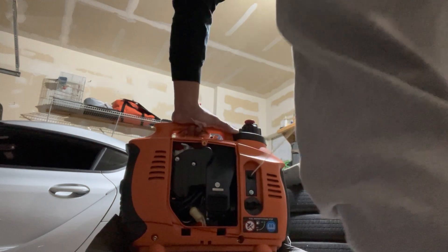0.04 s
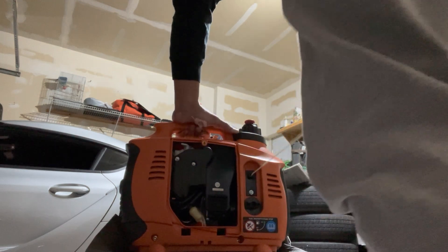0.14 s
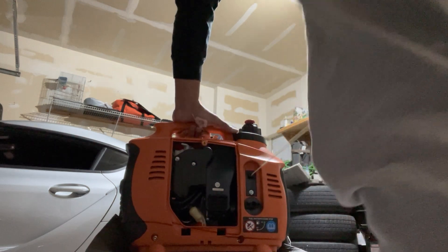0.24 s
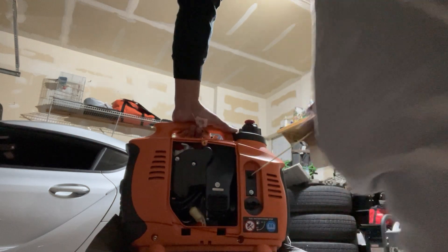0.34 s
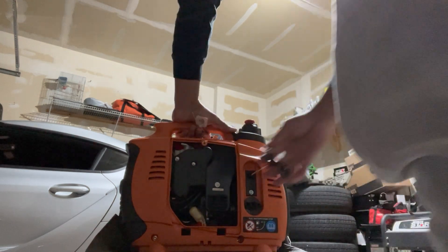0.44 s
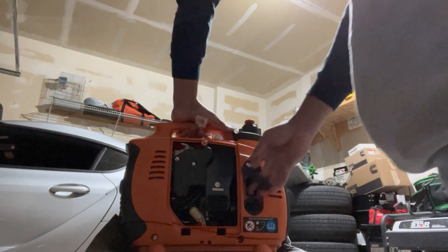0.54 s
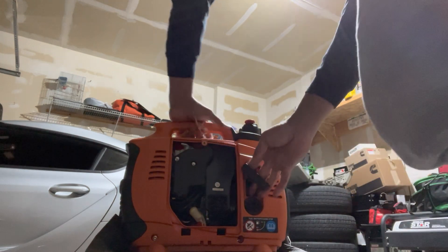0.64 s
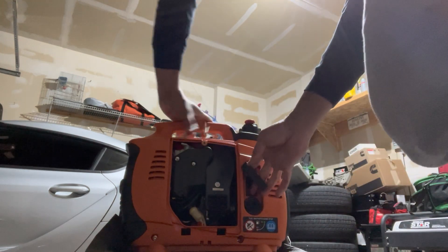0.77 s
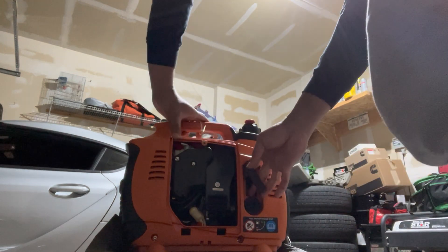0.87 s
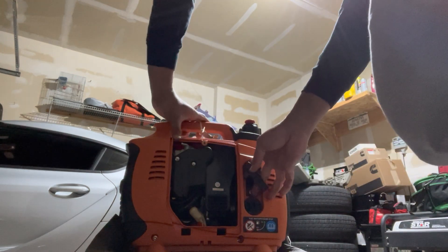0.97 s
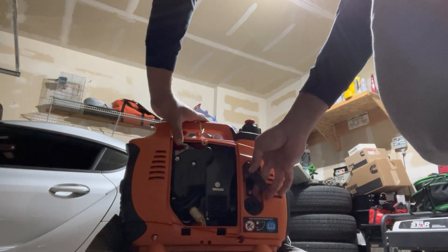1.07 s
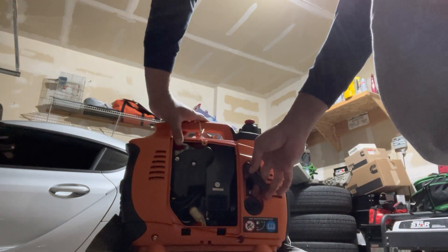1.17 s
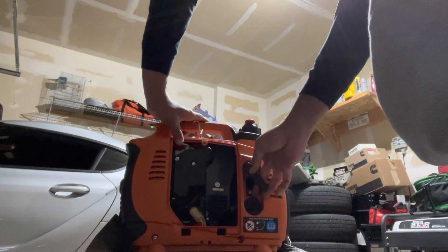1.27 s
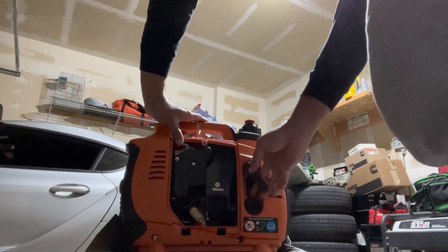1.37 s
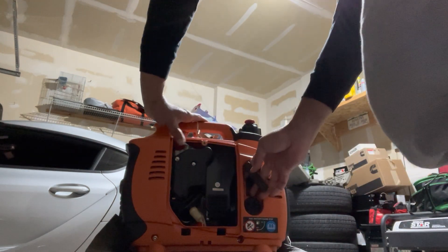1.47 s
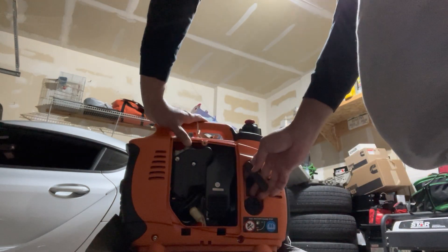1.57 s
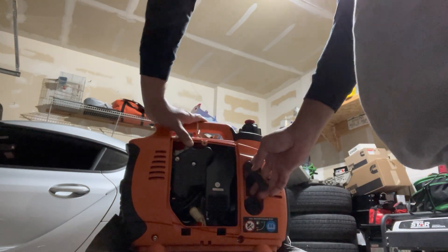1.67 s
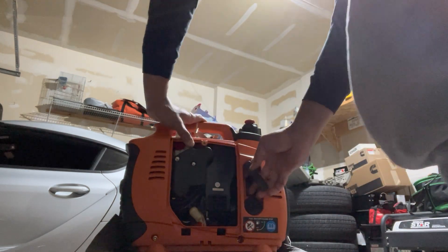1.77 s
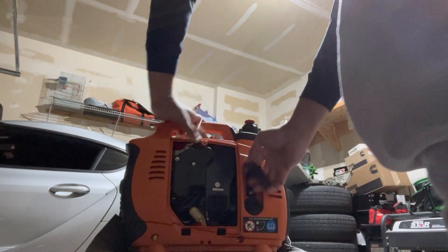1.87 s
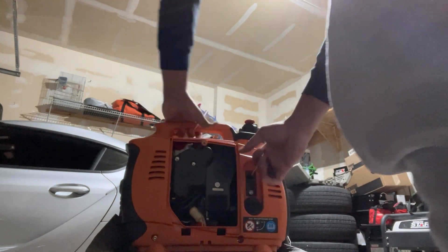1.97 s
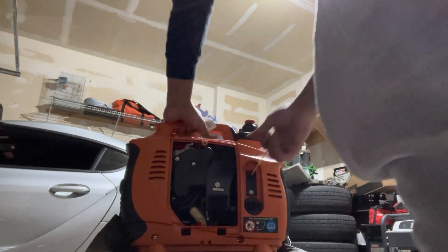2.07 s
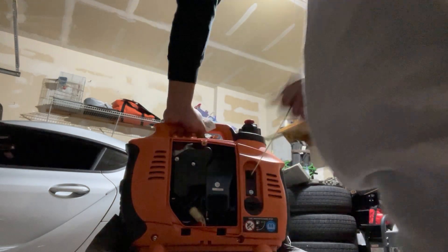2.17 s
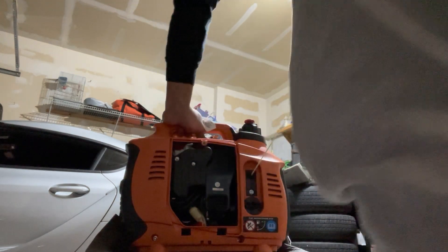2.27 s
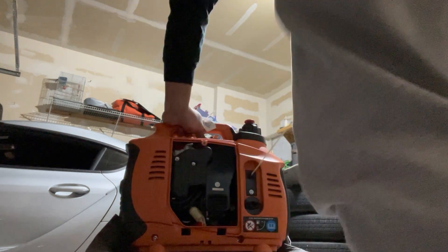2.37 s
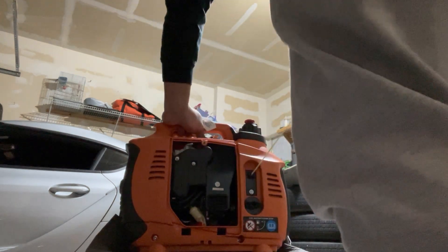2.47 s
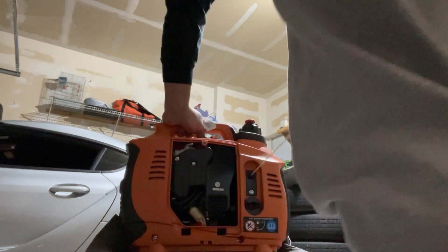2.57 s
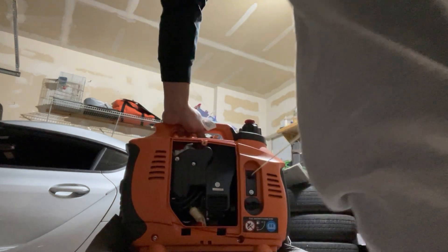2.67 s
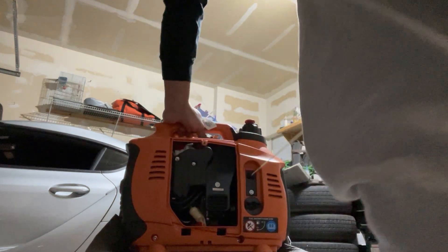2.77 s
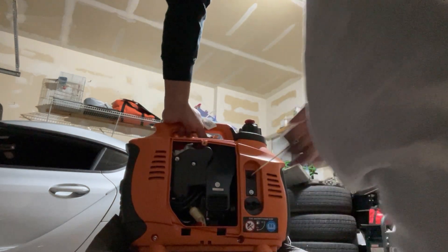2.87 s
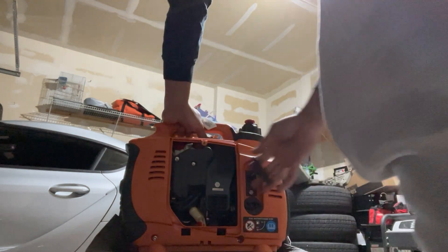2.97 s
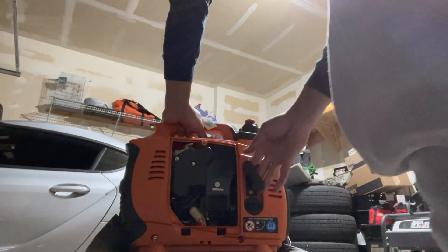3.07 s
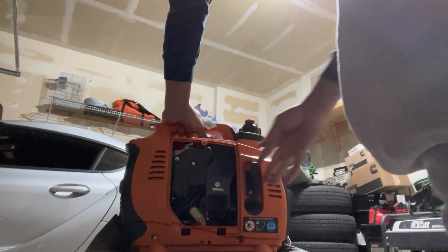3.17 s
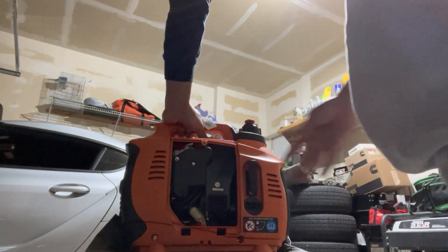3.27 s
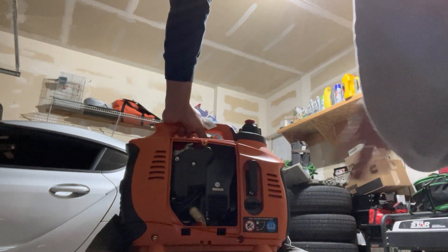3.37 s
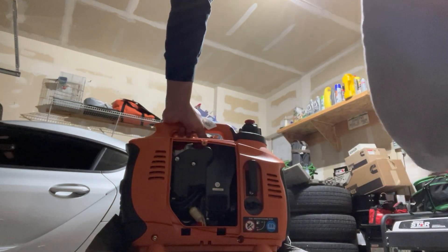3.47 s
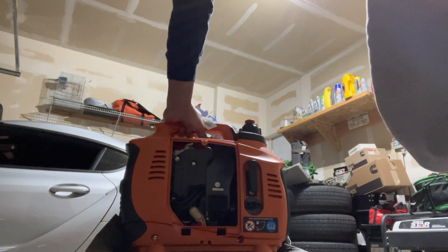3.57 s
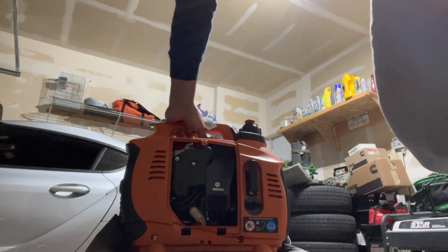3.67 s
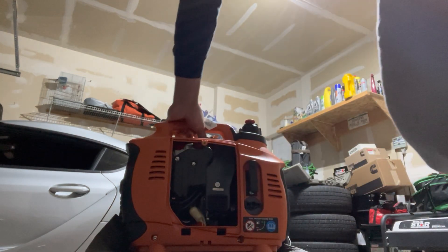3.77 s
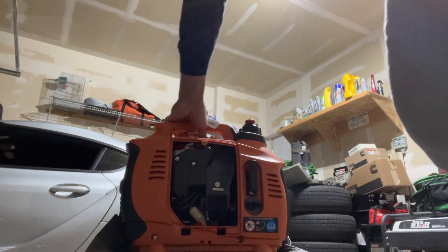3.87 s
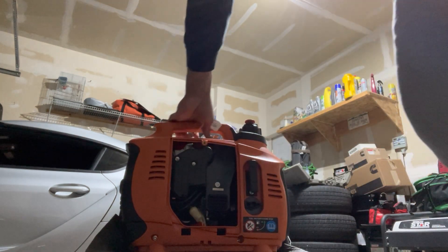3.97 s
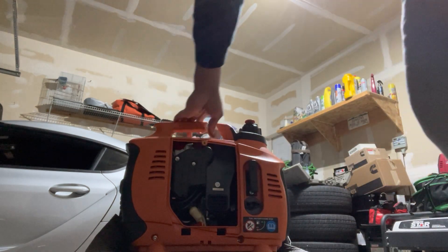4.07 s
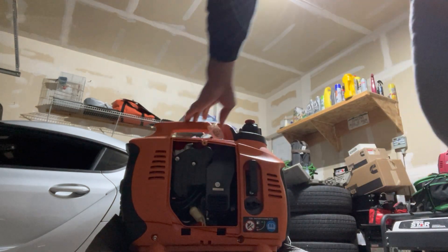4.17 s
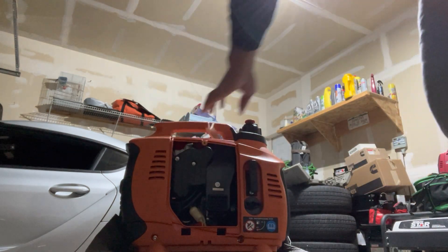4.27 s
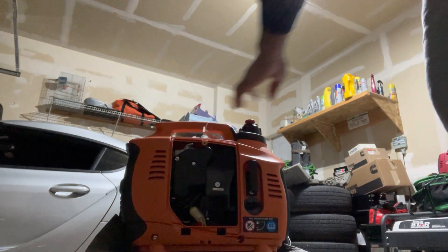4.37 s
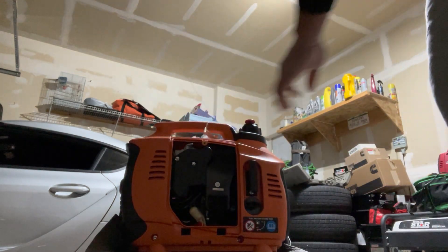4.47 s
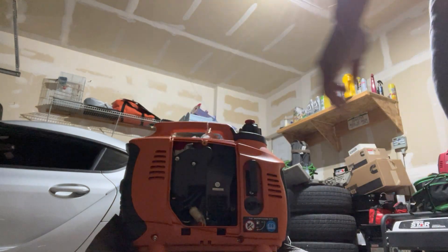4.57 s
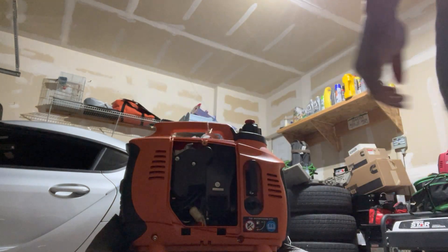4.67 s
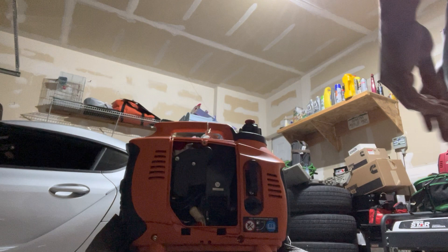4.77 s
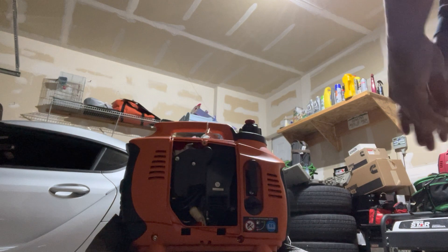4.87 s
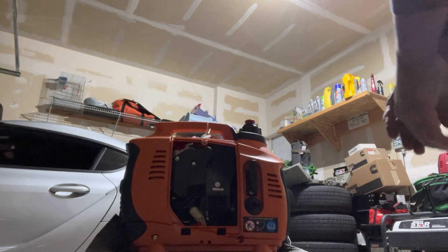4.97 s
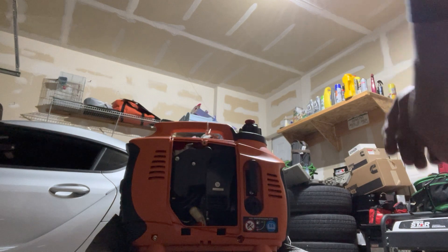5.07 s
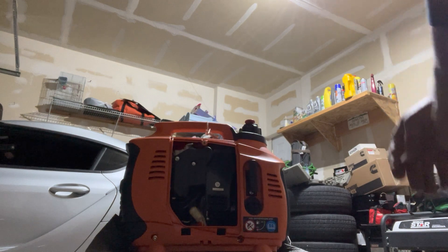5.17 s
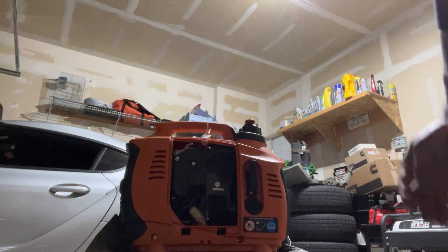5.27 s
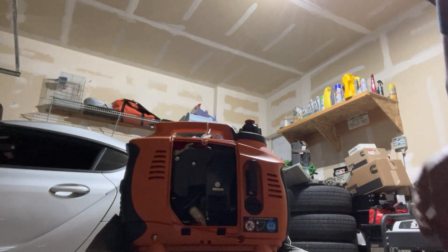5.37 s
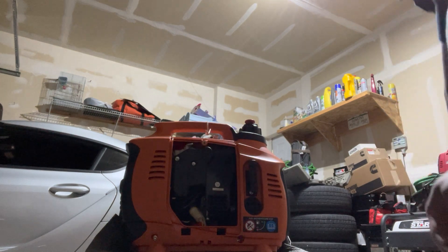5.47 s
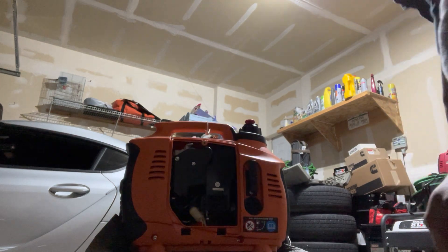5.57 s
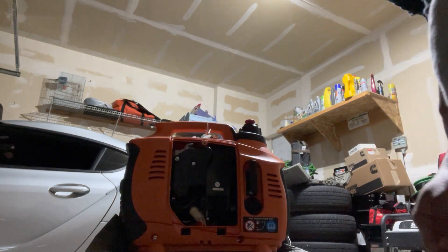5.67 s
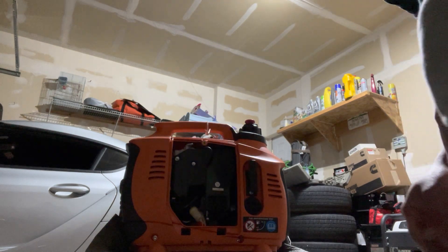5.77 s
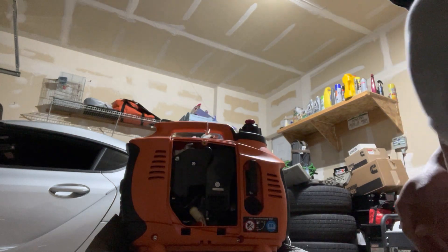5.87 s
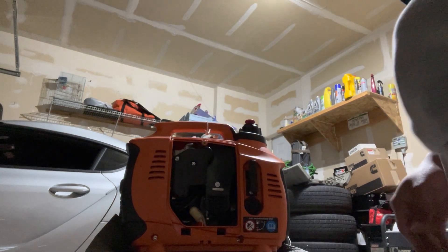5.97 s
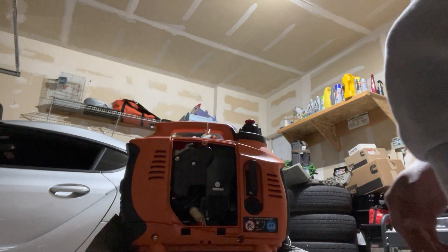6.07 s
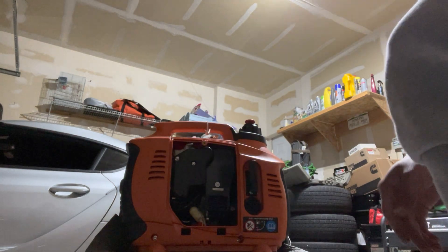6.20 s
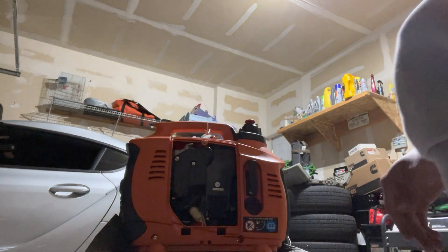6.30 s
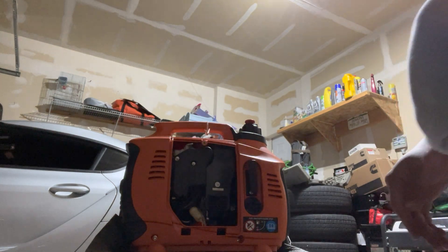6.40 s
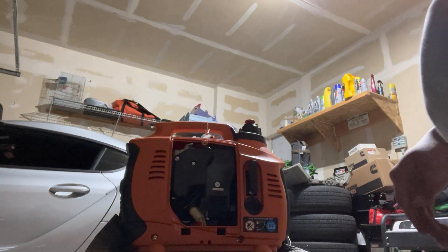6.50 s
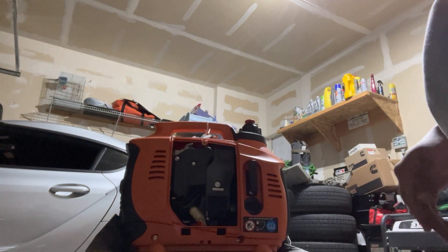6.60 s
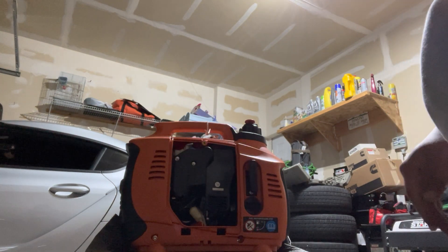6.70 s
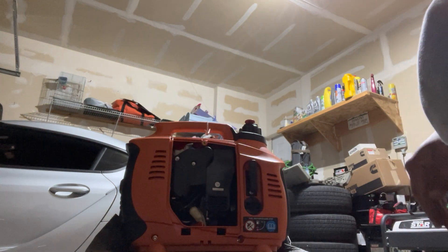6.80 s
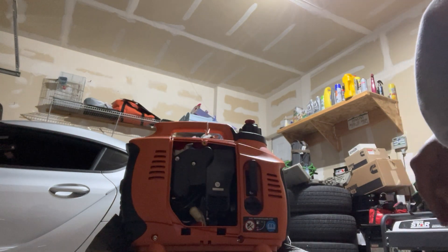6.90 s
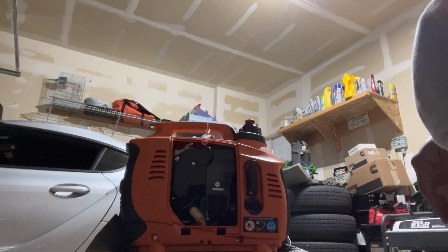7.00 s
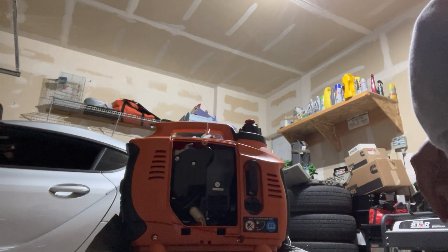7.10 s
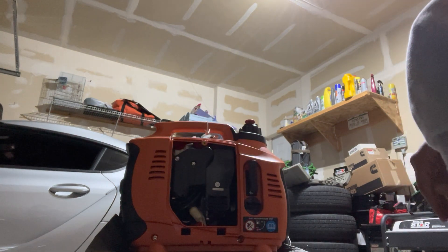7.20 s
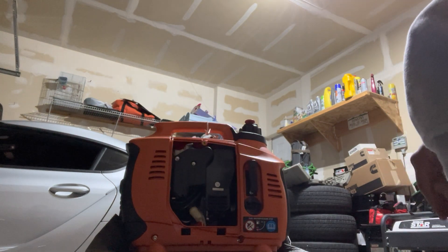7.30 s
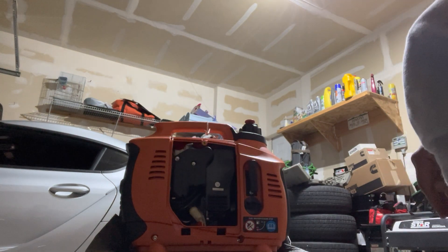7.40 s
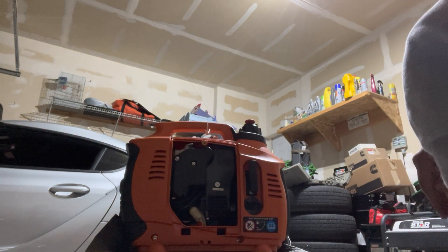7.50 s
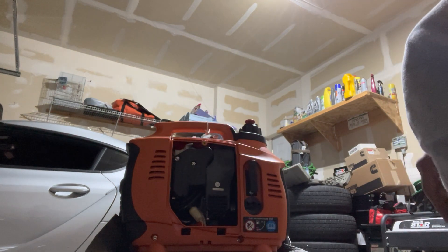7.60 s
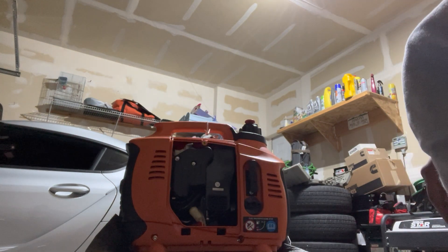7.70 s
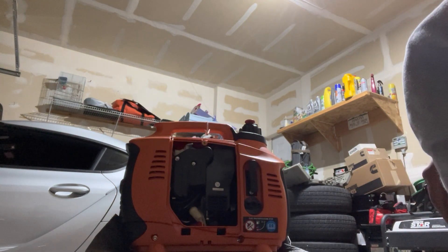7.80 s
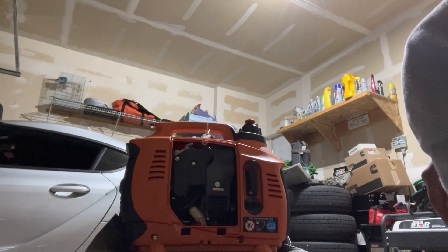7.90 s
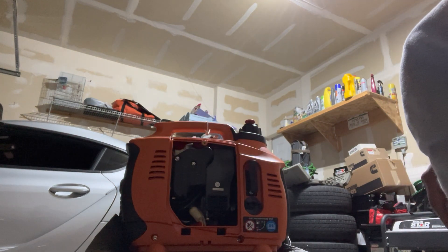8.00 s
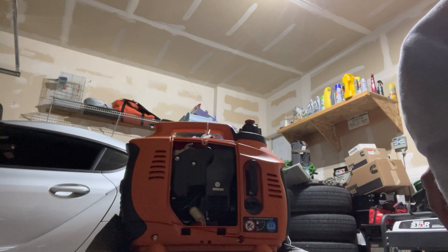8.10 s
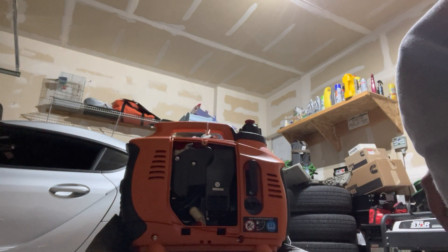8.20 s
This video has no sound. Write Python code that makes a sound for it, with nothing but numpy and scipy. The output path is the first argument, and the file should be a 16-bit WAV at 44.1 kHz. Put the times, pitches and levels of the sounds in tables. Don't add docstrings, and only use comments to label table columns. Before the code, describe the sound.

A small generator clatters to a stop, a switch clicks, the starter rope is yanked, and the engine catches, revs up and settles into steady running.

```python
import sys
import numpy as np
from scipy import signal
from scipy.fft import rfft, irfft, next_fast_len
from scipy.io import wavfile

SR = 44100
rng = np.random.default_rng(int(sys.argv[2]) if len(sys.argv) > 2 else 0)


def wav_record(signal):
    frames = np.transpose(np.atleast_2d(signal))
    bounded = np.clip(frames, -1, 1)
    quanta = np.round(bounded * 32767).astype(np.int16)
    wavfile.write(sys.argv[1], SR, quanta)


def boost_factor(decibels):
    exponent = np.asarray(decibels, float) / 20
    return 10 ** exponent


N = 363825
TIME = np.arange(N) / SR
FREQ = np.maximum(np.arange(N // 2 + 1) * SR / N, 1)

# time in seconds, turns in Hz.
COAST_SPEED = [(0, 25), (0.1, 26.5), (0.25, 20.5), (.36, 17.9), (.435, 17.2), (.5, 13), (1.2, 5.2),
               (2.08, 5.2), (2.149, 22), (2.211, 18), (2.448, 19)]
# time in seconds, turns in Hz.
FIRING_SPEED = [(2.5, 19.49), (2.62, 22.31), (2.75, 26.76), (2.9, 33.15), (3.05, 36.74), (3.35, 42.88),
                (3.55, 45.7), (3.75, 46.86), (3.95, 48.73), (4.2, 49.13), (4.75, 49.88), (5.2, 49.23),
                (5.7, 48.45), (6.2, 47.36), (6.7, 46.39), (7.2, 45.42), (7.7, 45.78), (8.25, 45.29)]
# time in seconds, housing level in dB.
CRANK_LEVEL = [(0.0, -35.5), (0.11, -35.5), (0.42, -41), (0.57, -44.5), (0.83, -53.5), (1.04, -62),
               (1.3, -70), (1.55, -69), (2.05, -68), (2.14, -51.5), (2.24, -38), (2.41, -33), (2.6, -32.5),
               (2.75, -30)]
# level in dB at the mark, share of the swing.
CRANK_LAW = [(-36, 1.0), (-36.5, 1.2), (-52, 1.25)]
# rumble, housing, hiss in dB.
COASTING_EXTRA_DB = (-4.5, 3, 5)
# rumble, housing, hiss in dB.
FINGERS_DB = (-90, -61.5, -68)
# frequency in Hz, density in dB per Hz.
CRANK_NOISE = [(30, -18), (80, -6.5), (170, -10), (269, -6.5), (450, -7), (700, -7), (1200, -10),
               (1600, -16), (2250, -11), (2800, -18), (3700, -15), (5500, -21), (8000, -21), (15500, -39.5)]
# centre in Hz, width in Hz, gain in dB.
CASE_PEAKS = [(263, 38, 6), (710, 94, 6), (1065, 42, 6.5), (1240, 34, -1.5), (2000, 32, 1), (3580, 90, 2),
              (4300, 70, -12)]
# centre in Hz, width in Hz, gain in dB.
STANDING_WAVES = [(49.3, 2.6, 6.5), (81.3, 5.9, 11.5), (134, 3, -7.5), (181, 5.3, -26), (230.7, 10.4, 9),
                  (247, 6.1, 10.5), (246, 15, -5.5), (290.5, 10.3, -13), (342.6, 2.8, -42), (704, 82, 18.5),
                  (1945, 80, 13), (150, 58, -6), (395, 6.6, -9.5), (428, 19, -11.5), (3150, 46, -1),
                  (3720, 180, 4.5), (4540, 83, 13)]
# frequency in Hz, correlation from 0 to 1.
LIKENESS = [(60, 1), (250, .85), (700, .75), (1500, .2), (2300, .45), (3000, .3), (3800, .6), (4800, .3),
            (6900, .4), (7500, .85), (9700, .55), (11000, .97), (13300, 1), (14600, .45)]

# time in seconds, body in dB, bright in dB.
COAST_KNOCKS = [(0.021, -27, -33), (0.056, -15.5, -36), (0.089, -35, -32), (0.128, -23, -34),
                (0.152, -27, -37), (0.172, -34, -42), (0.225, -36, -49), (0.249, -23, -53), (0.2, -25, -36),
                (0.288, -20, -34.5), (0.316, -36, -50), (0.343, -28, -45), (0.397, -40, -58),
                (0.418, -40, -43), (0.386, -23, -40), (0.445, -27, -52), (0.506, -15.5, -42.5),
                (0.54, -16, -39.5), (0.583, -41, -46), (0.589, -44, -47), (0.62, -24, -59),
                (0.662, -18.5, -44), (0.709, -26, -48), (0.716, -40, -50), (0.803, -30, -66),
                (0.845, -40, -61), (0.903, -50, -59), (0.935, -30, -60), (1.019, -26, -54),
                (1.227, -39.5, -72)]
# time in seconds, body in dB, bright in dB.
HAND_KNOCKS = [(1.457, -48, -61), (1.515, -51, -73), (1.653, -27, -50), (1.842, -66, -67),
               (1.853, -54, -48.5), (1.95, -34, -62), (1.962, -33, -56), (1.997, -29, -51),
               (2.05, -46, -63), (2.192, -20.5, -40.5), (2.226, -45, -46), (2.428, -17, -38),
               (2.282, -21, -39), (2.341, -26, -31), (2.476, -22, -35), (2.506, -35, -29)]
# time in seconds, body in dB, bright in dB.
PAWL_KNOCKS = [
    (1.066, -55, -60),
    (1.907, -45, -59),
    (1.921, -40, -41.5),
    (2.172, -29, -43),
    (2.416, -16.5, -30),
    (2.449, -22, -21),
    (2.607, -12, -43),
]
# time in seconds, body in dB, bright in dB.
VALVE_KNOCKS = [(2.53, -29, -22), (2.58, -19, -20.5), (2.624, -26.5, -21.5), (2.666, -40, -24),
                (2.707, -39, -22), (2.744, -37, -21.5), (2.778, -37, -19.5), (2.809, -26, -23),
                (2.843, -32, -21), (2.875, -15, -27), (2.906, -13, -25), (2.94, -38, -24),
                (2.994, -10, -23)]
# low edge in Hz, high edge in Hz, T60 in seconds.
KNOCK_BANDS = [(200, 650, .05), (650, 1500, .025), (1500, 7500, .045), (7500, 15800, .03)]
# frequency in Hz, level in dB, T60 in seconds.
COVER = [(723, 2, 0.024), (1007, -1, 0.035), (1224, -2.5, 0.045)]
# frequency in Hz, level in dB, T60 in seconds.
VALVES = [(2166, 4, 0.029), (2330, 0.5, 0.027), (2554, -2.5, 0.046), (2993, -2.5, 0.061), (3364, -8, 0.039),
          (3600, 0.5, 0.05), (3930, 1.5, 0.036), (4423, -1, 0.047), (4704, -7, 0.059), (4960, 0, .035),
          (5300, -3, .04), (6030, -10, 0.054), (6500, -7.5, 0.049)]
# time in seconds, peak in dB, mode under the hand
# in Hz, T60 in seconds.
THUDS = [
    (0.823, -33.5, 247, 0.11),
    (0.843, -22, 73.5, 0.036),
    (1.047, -48.5, 384, 0.33),
    (1.95, -25, 483, 0.052),
    (1.96, -27, 376, 0.19),
    (1.994, -21.5, 634, 0.052),
    (4.87, -27, 127, .12),
    (6.328, -30, 133, 0.13),
]
CASE_HZ = (279, 488)
# frequency in Hz, level in dB, T60 in seconds.
SWITCH_MODES = [(770, -10, 0.078), (883, 0.5, 0.04), (1200, -11, 0.093), (1750, -6, 0.022),
                (2170, 0, 0.034), (4160, -7, 0.04), (5300, -5, 0.04), (5800, -4, 0.03), (6600, -24, 0.082)]
# time in seconds, ratchet in Hz, level in dB.
ROPE = [
    (2.1, 620, -52),
    (2.155, 880, -35),
    (2.18, 1200, -44),
    (2.2, 700, -37),
    (2.232, 870, -32),
    (2.255, 880, -35),
    (2.295, 1150, -37),
    (2.33, 1180, -39),
    (2.38, 1150, -54),
]
# time in seconds, pitch in Hz, level in dB.
ROPE_RUB = [
    (2.235, 1240, -50),
    (2.26, 1290, -38),
    (2.35, 1320, -37),
    (2.38, 1300, -50),
]
# time in seconds, pitch in Hz, level in dB.
REWIND = [
    (2.31, 900, -50),
    (2.36, 1010, -39),
    (2.44, 1190, -38),
    (2.5, 1380, -40),
    (2.54, 1300, -52),
]

# time in seconds, housing level in dB.
LOAD = [(2.5, -28.5), (2.7, -26.5), (2.9, -23.5), (3.35, -24.5), (3.6, -25.5), (4.2, -27.5), (6.0, -28),
        (6.8, -29), (8.25, -29)]
# multiple of crank speed, level in dB.
ORDERS_DB = [(1, -50.5), (2, -38), (3, -46), (4, -43.5), (5, -40), (6, -39), (7, -40.5), (8, -45), (9, -43),
             (40, -56.5), (60, -66), (80, -59), (90, -84)]
ORDER_PHASE = {1: -2.7, 2: 1.2, 3: .2, 4: -1.5, 5: 1.5, 6: 1.0, 7: 1.2, 8: 0.4, 9: -1.0, 40: -2.4}
# time in seconds, slip in turns.
KNOCK_SLIP = [(2.5, -.2), (2.75, -.27), (3.05, -.27), (3.35, -.07), (3.75, 0)]
# frequency in Hz, level in dB, T60 in seconds.
MUFFLER = [(355, 12.5, 0.031), (508, 6, 0.065), (491, 14, 0.026)]
# frequency in Hz, level in dB, T60 in seconds.
HOUSING = [(435.4, -4.5, 0.048), (599, 5.5, 0.023), (645.3, 5, 0.052), (744, -1, 0.035),
           (921.4, -10.5, 0.092), (1108, -2, 0.024), (1209, -4.5, 0.067), (1297, -4, 0.045),
           (1477, -13, 0.091), (1622, -10, 0.029), (2086, -13, 0.02)]
# frequency in Hz, level in dB, T60 in seconds.
BOOM = [(270, 4, 0.1), (310, -3, 0.087)]
# frequency in Hz, density in dB per Hz.
RUN_NOISE = [(24, -46), (40, -82), (96, -55), (171, -48), (231, -16), (529, -10.5), (646, -14), (831, -8),
             (1270, -14.5), (2700, -22), (4570, -28.5), (7170, -31.5), (12800, -39), (14800, -37),
             (16000, -61)]
# centre in Hz, width in Hz, gain in dB.
METAL_PEAKS = [(2500, 43, -5), (2740, 110, -4.5), (2900, 40, -10.5), (3170, 60, -2.5), (3910, 71, -15),
               (4600, 57, 7), (4400, 45, -2), (4680, 50, 5), (5280, 250, 3.5), (6240, 270, 5)]

# frequency in Hz, radians by which left leads.
PORT_PHASE = [(60, 0), (1200, .1), (4400, 0), (5300, -3), (7900, -2.9), (10500, -.2), (14000, .1),
              (15700, 2.7)]
# frequency in Hz, left minus right in dB.
PORT_BALANCE = [(60, 1.5), (130, -4.5), (290, -2), (640, -0.5), (1410, 0.5), (3100, 0.5), (6820, 0.5),
                (15000, -1.5)]

CRANK_MARK_DB = -37
SETTLED_DB, SETTLED_HZ = -28, 46


def rms_one(x):
    return x / np.sqrt(np.mean(x ** 2) + 1e-20)


def in_time(rows):
    s, *columns = np.transpose(rows)
    return [np.interp(TIME, s, c) for c in columns]


def at_hz(points):
    hz, value = np.transpose(points)
    return np.interp(np.log(FREQ), np.log(hz), value)


def fade(t0, t1):
    return np.clip((TIME - t0) / (t1 - t0), 0, 1)


def drift(rate):
    knots = rng.standard_normal(int(N / SR * 200) + 2)
    r = np.exp(-2 * np.pi * rate / 200)
    slow = rms_one(signal.lfilter([1], [1, -2 * r, r * r], knots))
    return np.interp(TIME * 200, np.arange(len(knots)), slow)


def band(x, low_hz, high_hz):
    edges = [low_hz, min(high_hz, .45 * SR)]
    return signal.sosfilt(signal.butter(2, edges, "band", fs=SR, output="sos"), x)


def ring(clicks, hz, t60):
    r, w = boost_factor(-60 / (t60 * SR)), 2 * np.pi * hz / SR
    return signal.lfilter([0, np.sin(w)], [1, -2 * r * np.cos(w), r * r], clicks + 1e-18)


def passing(hz, peaks=STANDING_WAVES):
    return sum(db * np.exp(-((hz - centre_hz) / width_hz) ** 2) for centre_hz, width_hz, db in peaks)


def coloured(gate, spectrum, peaks):
    left, other = rfft(rng.standard_normal((2, N)) * gate)
    alike = np.clip(at_hz(LIKENESS), 0, 1)
    right = alike * left + np.sqrt(1 - alike ** 2) * other
    noise = rms_one(irfft(np.array([left, right]) * boost_factor(at_hz(spectrum)), N))
    return irfft(rfft(noise) * boost_factor(passing(FREQ, peaks)), N)


def split(x, edges_hz, levels_db):
    below = [1 / (1 + (FREQ / hz) ** 4) for hz in edges_hz]
    shares = [below[0], below[1] - below[0], 1 - below[1]]
    return sum(boost_factor(db) * rms_one(irfft(rfft(x) * share, N)) for share, db in zip(shares, levels_db))


def puff(turns, offset, depth_db, decay):
    return boost_factor(depth_db * np.exp(-((turns - offset) % 1) / decay))


def crank_speed():
    return in_time(list(COAST_SPEED) + list(FIRING_SPEED))[0]


def crank_turns():
    turns = np.cumsum(crank_speed()) / SR
    return turns - turns[round(FIRING_SPEED[0][0] * SR)]


def crank_swing():
    return in_time(CRANK_LEVEL)[0] - CRANK_MARK_DB


def pumped_air(turns):
    swing_db, fingers, coasting = crank_swing(), fade(1.64, 1.652), 1 - fade(1.9, 2.3)
    levels = []
    for (db, share), hand_db, extra_db in zip(CRANK_LAW, FINGERS_DB, COASTING_EXTRA_DB):
        moving = boost_factor(db + share * swing_db + extra_db * coasting)
        levels.append(20 * np.log10(moving + fingers * boost_factor(hand_db)))
    ticks_db = 1.8 * np.minimum(rng.exponential(1, N // 100 + 1), 3)
    rattle = boost_factor(ticks_db).repeat(100)[:N] * boost_factor(1.1 * drift(24))
    noise = coloured(puff(turns, 0.46, 4.2, 0.13) * rattle, CRANK_NOISE, CASE_PEAKS)
    return split(noise, [400, 1800], levels)


def fan_whine(turns):
    level_db = -51.5 + 0.88 * crank_swing() + passing(40 * crank_speed()) + 2.3 * drift(36)
    braking = 9.0 * fade(2.1, 2.2) * np.sin(np.pi * turns)
    return boost_factor(level_db) * np.sin(80 * np.pi * turns + 0.69 * drift(27) + braking)


def knocks():
    # knocks, low under body in dB, air under bright in dB
    kinds = [(COAST_KNOCKS, -14, -3.4), (HAND_KNOCKS, -1.5, -46),
             (PAWL_KNOCKS, 1, -0.24), (VALVE_KNOCKS, -1.8, -10)]
    rows = np.array([(s, body + low_db, body, bright, bright + air_db)
                     for table, low_db, air_db in kinds for s, body, bright in table])
    age = np.arange(4000) / SR
    contact = np.minimum(age / 0.0032 + .2, 1)
    white = rng.standard_normal((len(rows), 4000)) * contact
    tracks = np.zeros((len(KNOCK_BANDS), N))
    for track, (low_hz, high_hz, t60), levels_db in zip(tracks, KNOCK_BANDS, rows.T[1:]):
        bursts = band(boost_factor(-60 * age / t60) * white, low_hz, high_hz) * np.sqrt(SR / 8 / (high_hz - low_hz))
        size = np.sqrt(np.mean(bursts ** 2, axis=1))
        bursts = bursts * (np.median(size) / size)[:, None]
        for s, db, burst in zip(rows[:, 0], levels_db, bursts):
            track[round(s * SR):][:4000] += boost_factor(db) * burst
    low, body, bright, air = tracks
    cover = sum(boost_factor(db - 34.5) * ring(body, hz, t60) for hz, db, t60 in COVER)
    metal = sum(boost_factor(db - 35) * ring(bright, hz, t60) for hz, db, t60 in VALVES)
    metal = metal + boost_factor(1.5) * band(bright, 3000, 5200)
    return boost_factor(-1.5) * low + boost_factor(-6.5) * band(body, 470, 2050) + cover + boost_factor(-4) * bright + metal + boost_factor(2.5) * air


def lamp_hum():
    return boost_factor(-87) * np.sin(2 * np.pi * 1950 * TIME)


def street_rumble():
    return boost_factor(-60.5 + 3.2 * drift(6.1)) * rms_one(band(rng.standard_normal(N), 51, 130))


def garage(x):
    size = next_fast_len(N + SR)
    hz = np.arange(size // 2 + 1) * SR / size
    t60 = .55 / (1 + hz / 5000)
    tail = np.zeros((2, len(hz)), complex)
    for k, lag in enumerate(rng.uniform(.011, 0.037, 12)):
        echo = boost_factor(-60 * lag / t60) * np.exp(-2j * np.pi * hz * lag)
        tail[k % 2] += (-1) ** (k // 2) * echo / (1 - echo)
    for lag in (.0013, .0031, .0053):
        step = np.exp(-2j * np.pi * hz * lag)
        tail *= (step - .6) / (1 - .6 * step)
    return irfft(tail * rfft(x, size) / np.sqrt(6), size)[:, :N]


def thuds():
    out = np.zeros(N)
    age = np.arange(8000) / SR
    attack = np.minimum(age / 0.0035, 1)
    for s, peak_db, own_hz, t60 in THUDS:
        for hz, db in zip((own_hz, *CASE_HZ), (-6, -6, -12)):
            decay = boost_factor(peak_db + db - 60 * age / t60)
            out[round(s * SR):][:8000] += decay * np.sin(2 * np.pi * hz * age) * attack
    return out


def switch():
    start_s, panel_t60_s = 1.651, 0.039
    click = np.zeros(N)
    click[round(start_s * SR)] = boost_factor(-35)
    since = np.maximum(TIME - start_s, 0)
    decay = boost_factor(np.maximum(-25.5 - 60 * since / 0.019, -300))
    snap = band(rng.standard_normal(N) * (TIME >= start_s) * decay, 850, 9400)
    for k, (hz, db, t60) in enumerate(SWITCH_MODES):
        snap = snap + (-1) ** k * boost_factor(db) * ring(click, hz, min(t60, panel_t60_s))
    return snap


def rope_reel():
    tooth_hz, level_db = in_time(ROPE)
    overtone_db = level_db - 18 + 13 * fade(2.21, 2.236)
    spin = 2 * np.pi * np.cumsum(tooth_hz * (1 + .015 * drift(90))) / SR
    partials = boost_factor(level_db) * np.sin(spin) + boost_factor(overtone_db) * np.sin(2 * spin)
    return boost_factor(-3 + 3.5 * drift(50)) * partials * (TIME > ROPE[0][0]) * (1 - fade(2.38, 2.6))


def whistle(rows):
    hz, db = in_time(rows)
    sounding = (TIME > rows[0][0]) * (TIME < rows[-1][0])
    return boost_factor(db + 3.6 * drift(40)) * np.sin(2 * np.pi * np.cumsum(hz) / SR) * sounding


def blow_times(turns, offset):
    return np.flatnonzero(np.diff(np.floor(turns - offset)) > 0)


def struck(at, modes, spread_db, jitter_s):
    luck = rng.standard_normal((len(at), len(modes) + 1))
    at = np.clip(at + (jitter_s * SR * luck[:, -1]).astype(int), 0, N - 1)
    out = np.zeros(N)
    for k, (hz, db, t60) in enumerate(modes):
        clicks = np.zeros(N)
        clicks[at] = boost_factor(db + spread_db * luck[:, k]) * (-1) ** k
        out += ring(clicks, hz, t60)
    return out / np.sqrt(np.mean(out[N // 2:] ** 2))


def engine_load():
    swing_db = in_time(LOAD)[0] - SETTLED_DB
    return swing_db, -41 + swing_db + 0.5 * np.log2(crank_speed() / SETTLED_HZ)


def tone_levels(swing_db):
    every = np.arange(0, N, 64)
    speed = crank_speed()[every]
    return {round(k): 0.7 * swing_db + np.interp(np.arange(N), every, db + passing(round(k) * speed))
            for k, db in ORDERS_DB}


def engine_tones(turns, orders):
    alternator = {k: orders.pop(k) for k in (60, 80, 90)}
    orders[40] = orders[40] + 1 + .8 * drift(20) - 2.5 * np.cos(2 * np.pi * (turns - .3))
    tones = np.zeros(N)
    for k, db in orders.items():
        tones += boost_factor(db + 0.56 * drift(6.8)) * np.cos(2 * np.pi * k * turns + ORDER_PHASE[k])
    field = fade(3.5, 4.0)
    for k, db in alternator.items():
        tones += field * boost_factor(db + 1.5 * drift(10)) * np.cos(2 * np.pi * k * turns + .6 * drift(15))
    return tones


def engine_blows(piston):
    swing_db, hiss_db = engine_load()
    housing_db = swing_db + SETTLED_DB
    thump_at = blow_times(piston, .3)
    thump = struck(thump_at, MUFFLER, spread_db=1.5, jitter_s=.0001)
    knock = -struck(blow_times(piston, .5), HOUSING, spread_db=1.6, jitter_s=.00004)
    clack = struck(blow_times(piston, .64), VALVES, spread_db=2, jitter_s=.00002)
    shut = struck(blow_times(piston, .13), VALVES, spread_db=3, jitter_s=.00002)
    boom = boost_factor(housing_db - 3.5) * struck(thump_at, BOOM, spread_db=0.5, jitter_s=0) * (1 - fade(2.72, 2.91))
    blows = boost_factor(housing_db) * (boost_factor(-8.5) * thump + boost_factor(-1.5) * knock)
    blows = blows + boost_factor(hiss_db - 6) * (clack + boost_factor(-3) * shut)
    return band(blows, 273, SR) + band(boom, 220, 660)


def engine_noise(piston, bass_db):
    swing_db, hiss_db = engine_load()
    gate = puff(piston, 0.97, 2.6, 0.024) * puff(piston, .0, 4.0, 0.18) * puff(piston, 0.98, 0.68, 0.66)
    noise = coloured(gate * boost_factor(0.44 * drift(33)), RUN_NOISE, METAL_PEAKS)
    return split(noise, [300, 2000], [bass_db - 12, -38 + .3 * swing_db, hiss_db - 2.5])


def engine(turns):
    piston = turns + in_time(KNOCK_SLIP)[0]
    orders = tone_levels(engine_load()[0])
    spread = engine_noise(piston, orders[2]) + np.sqrt(2) * engine_tones(turns, orders)
    alive = fade(2.2, 2.75)
    return alive * engine_blows(piston), alive * spread


def scene():
    turns = crank_turns()
    unfired = 1 - fade(2.62, 2.95)
    cranked = unfired * fan_whine(turns) + rope_reel() + whistle(ROPE_RUB) + whistle(REWIND)
    fired, fired_wide = engine(turns)
    snaps = knocks() + switch()
    point = cranked + snaps + thuds() + fired
    to_walls = point - (1 - boost_factor(-3.5)) * fired
    sideways = boost_factor(-0.5) * band(snaps, 5660, 6800) * [[1], [-1]]
    wide = unfired * pumped_air(turns) + fired_wide + sideways
    return point + boost_factor(-3) * garage(to_walls) + wide + lamp_hum() + street_rumble()


def top_cut(x):
    return signal.sosfilt(signal.butter(12, 15950, fs=SR, output="sos"), x)


def record(dry):
    half = boost_factor(at_hz(PORT_BALANCE) / 2) * np.exp(.5j * at_hz(PORT_PHASE))
    low_cut = 1 / (1 + (33 / FREQ) ** 4)
    mix = irfft(rfft(dry) * low_cut * [half, 1 / half], N)
    return top_cut(mix)


dry = scene()
out = record(dry)
wav_record(out)
```